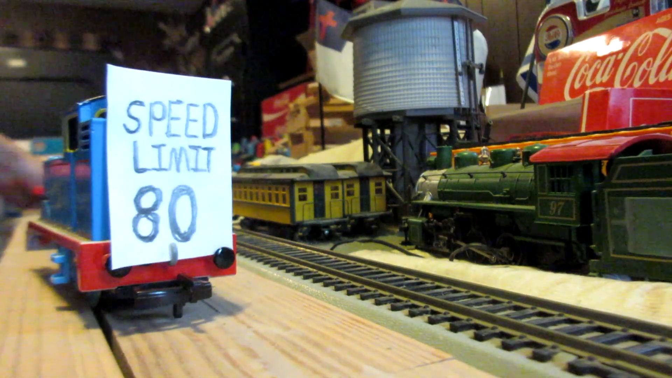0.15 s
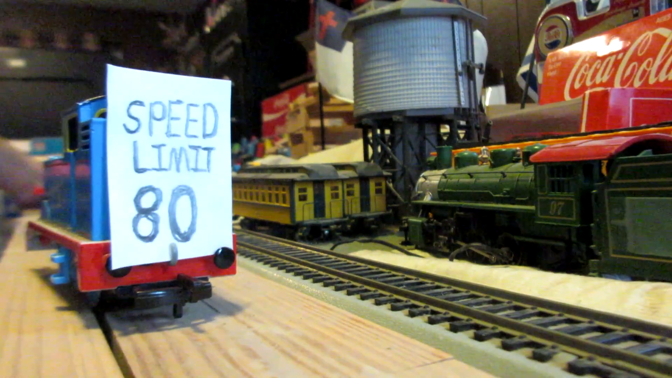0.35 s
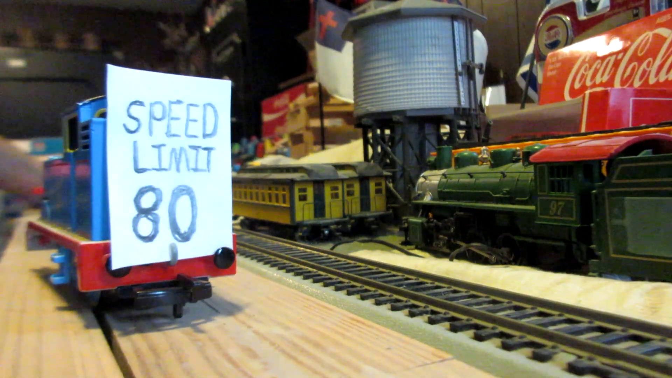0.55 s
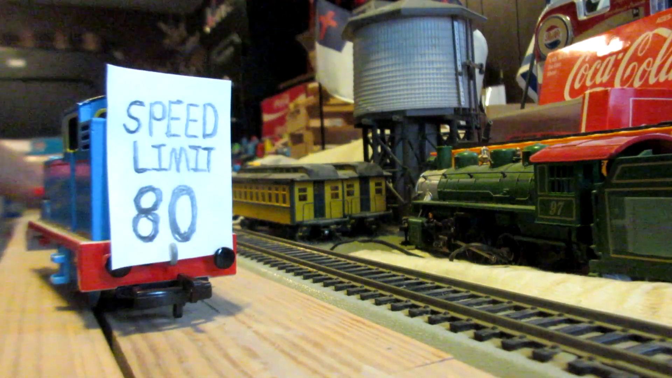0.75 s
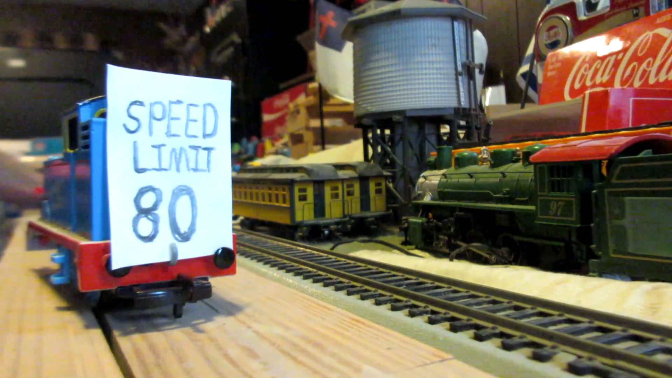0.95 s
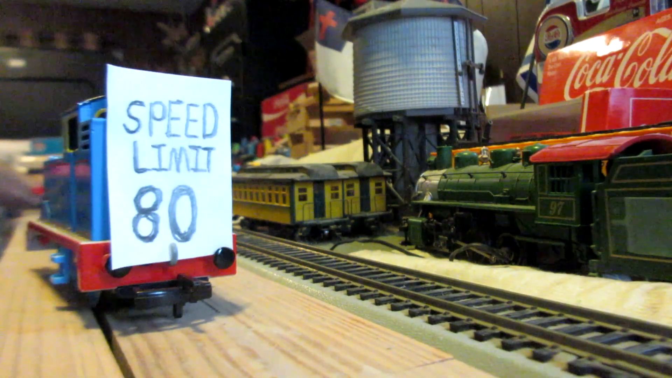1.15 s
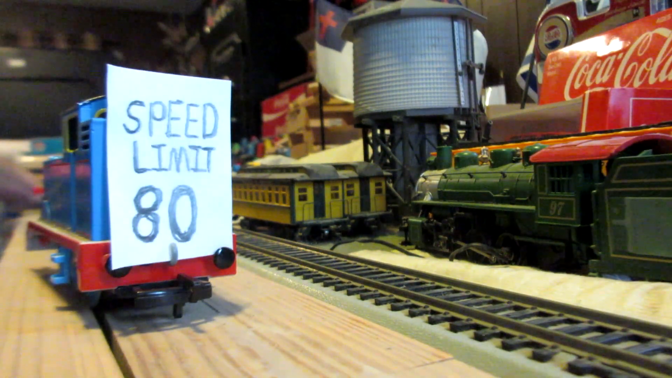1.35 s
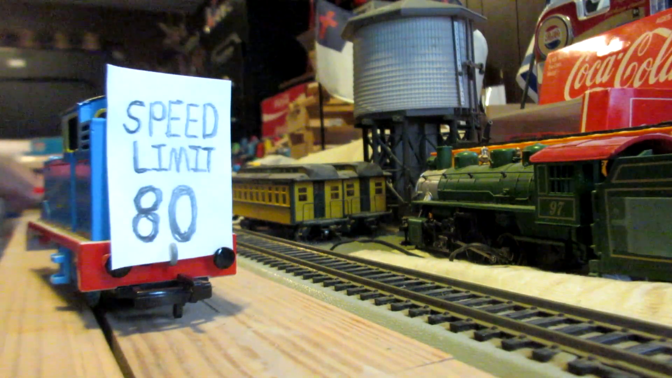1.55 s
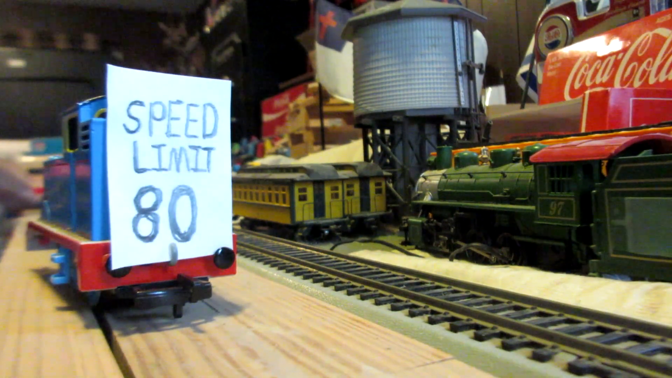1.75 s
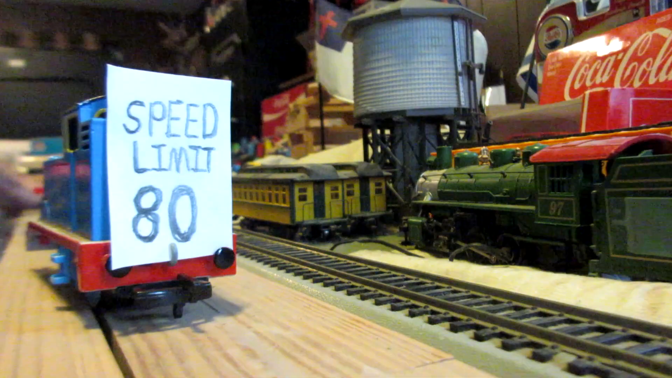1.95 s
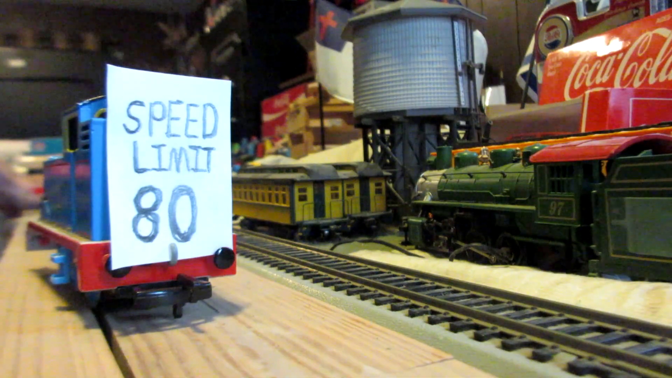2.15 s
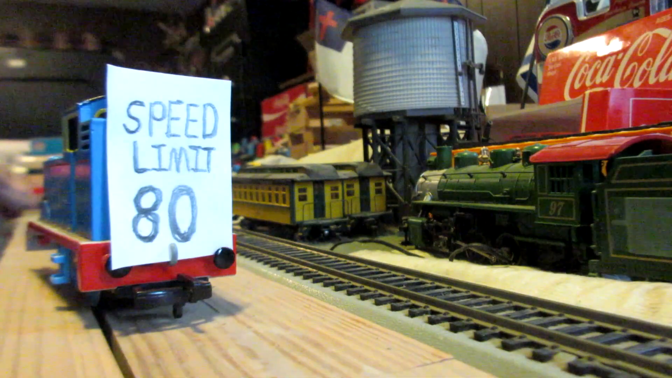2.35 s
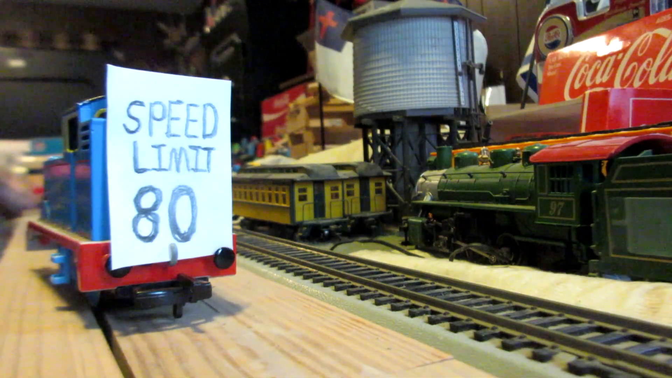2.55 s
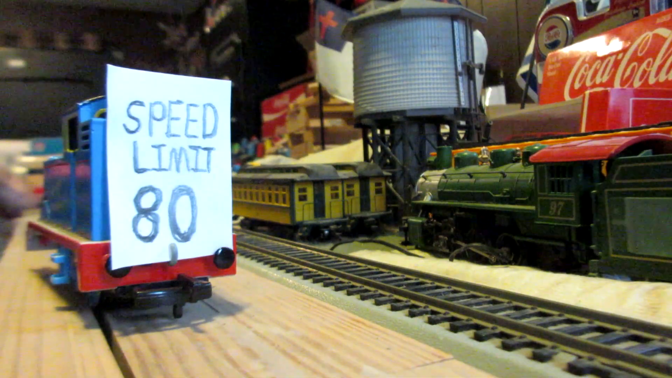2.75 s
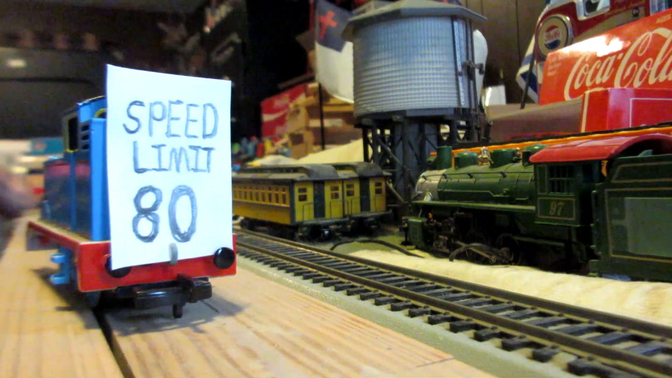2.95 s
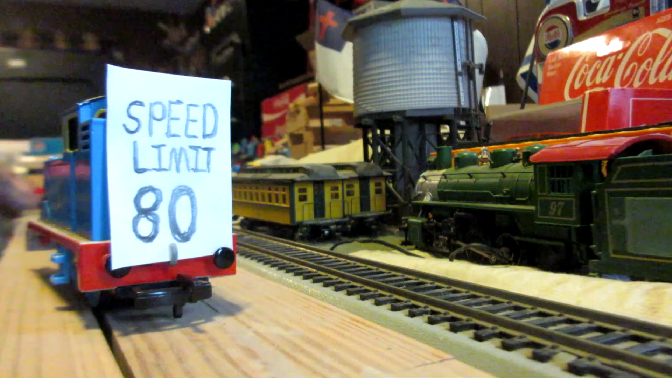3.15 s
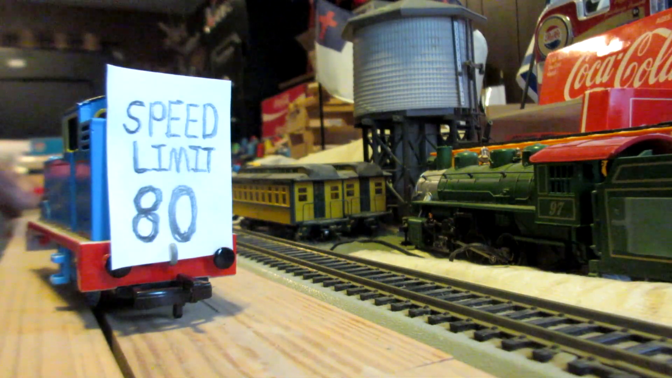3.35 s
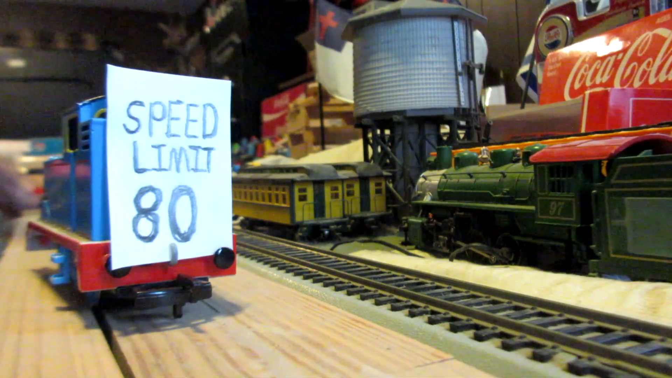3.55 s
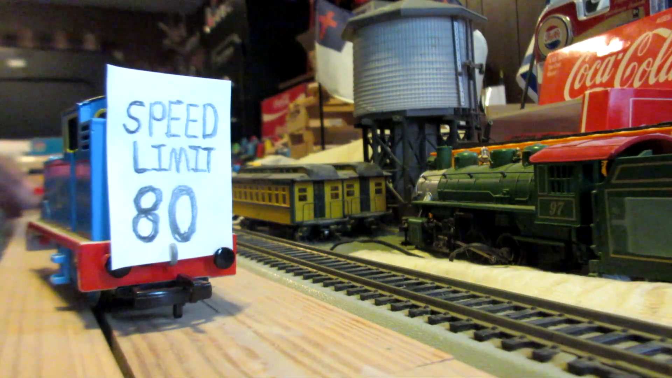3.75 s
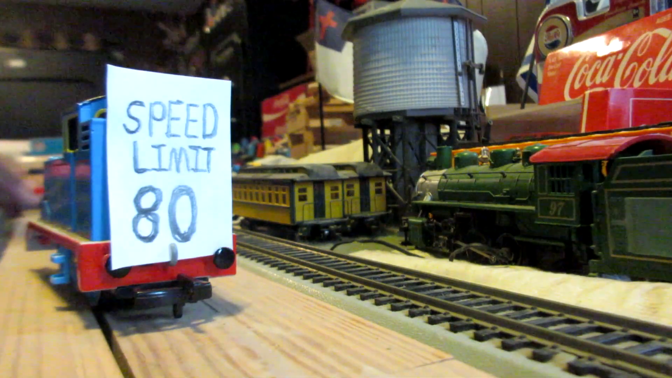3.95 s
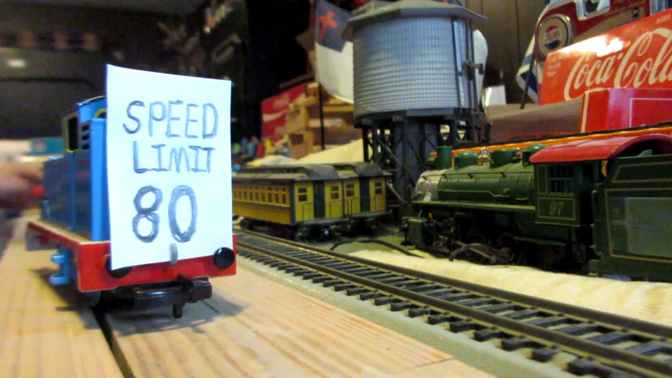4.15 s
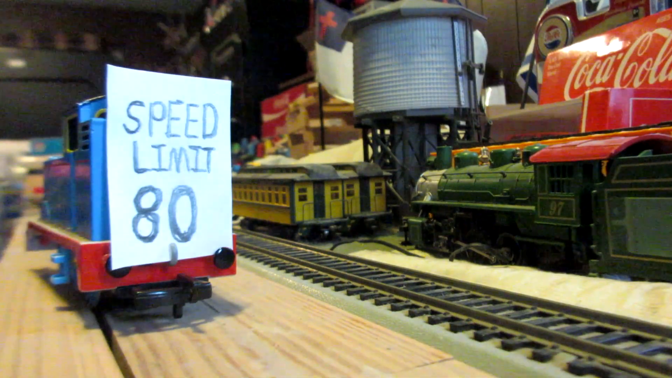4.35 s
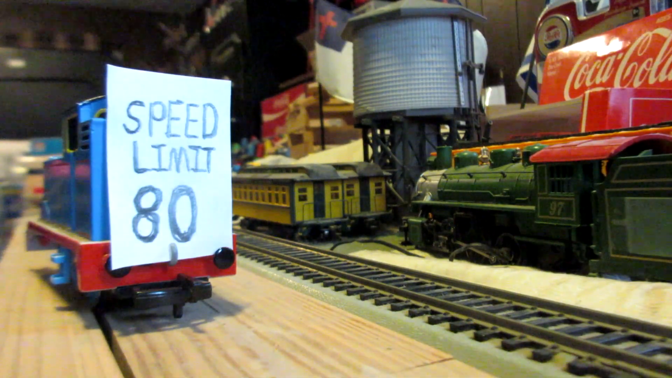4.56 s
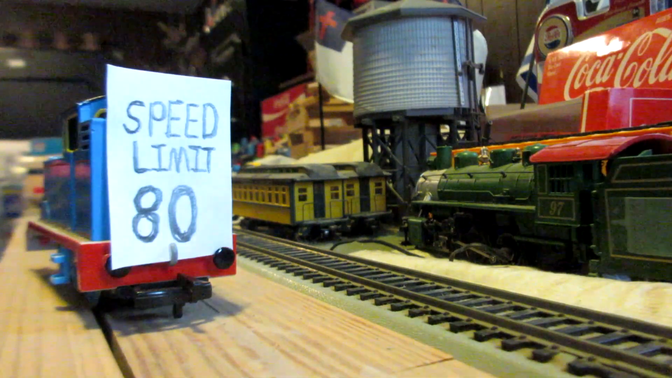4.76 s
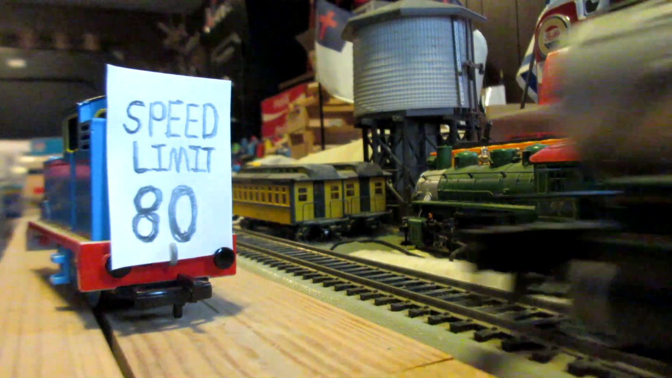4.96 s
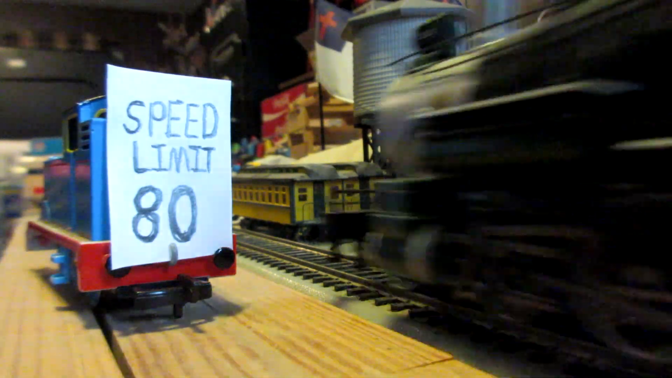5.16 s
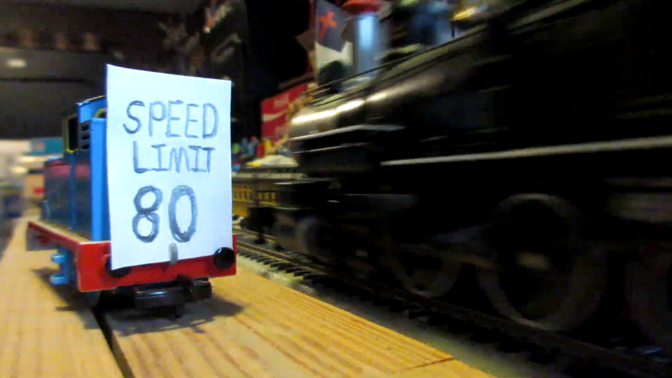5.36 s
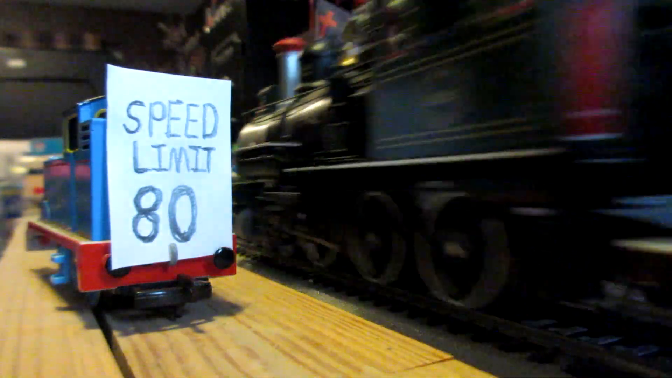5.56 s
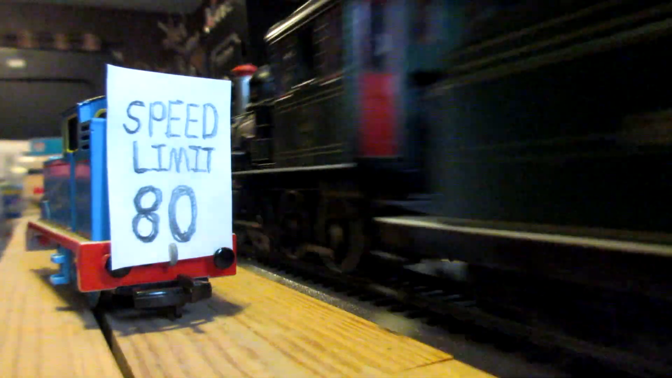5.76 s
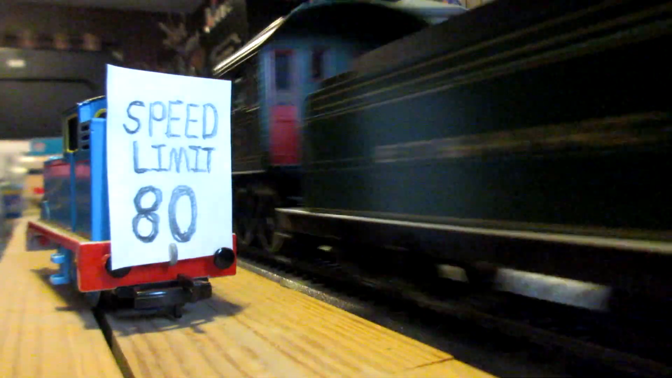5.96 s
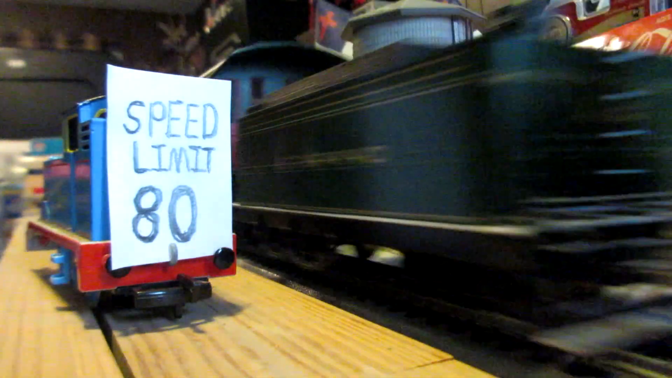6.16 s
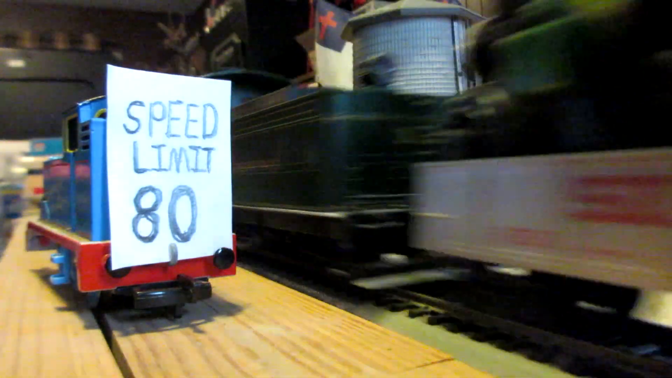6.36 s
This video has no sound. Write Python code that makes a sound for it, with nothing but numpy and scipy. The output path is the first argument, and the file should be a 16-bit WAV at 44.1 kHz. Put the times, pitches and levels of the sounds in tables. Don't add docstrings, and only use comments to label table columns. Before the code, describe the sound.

Close microphone on a wooden model railway layout indoors. A low knock and slight plastic scuff start things, with another soft bump a second later, then mostly quiet room air. Faint rail ticks and a thin rolling rattle emerge, swelling quickly into hard plastic and metal clacking, gritty wheel hiss and low table drumming as the small train passes, without fading before the cut.

```python
import sys
import numpy as np
from scipy import signal
from scipy.io import wavfile
from scipy.ndimage import uniform_filter1d

SR = 44100
rng = np.random.default_rng(int(sys.argv[2]) if len(sys.argv) > 2 else 0)


def wrap_up_sound(samples):
    columns = np.atleast_2d(samples).T
    tamed = np.clip(columns, -1, 1)
    steps = np.round(tamed * 32767).astype(np.int16)
    wavfile.write(sys.argv[1], SR, steps)


def volts_from_decibels(level):
    exponent = np.asarray(level, float) / 20
    return 10 ** exponent


N = 282681
TIME = np.arange(N) / SR

# (frequency [Hz], density [dB per Hz])
SCUFF = [(260, -21), (450, -5.5), (1110, 2), (1790, -6.5), (3180, -8), (5380, -19), (9000, -20.5),
         (11700, -38)]


def rolling():
    # (frequency [Hz], density [dB per Hz])
    axle_curve = [(1530, -2.5), (2600, 12), (3710, 4.5), (4280, 1), (4800, -5.5), (6240, -29),
                  (10600, -120)]
    # (frequency [Hz], density [dB per Hz])
    flange_curve = [(2740, -14.5), (4650, -1.5), (6200, -6.5), (8500, -16.5), (12000, -31.5), (15200, -55)]
    # (frequency [Hz], width [Hz], level over the flanges [dB])
    rail_modes = [(5500, 200, 8), (6250, 200, 5), (7280, 300, 8.6)]
    shudder = wobble(0.02)
    gears = contacts(1200, 3.6, 1.51) * volts_from_decibels(0.29 * shudder + 0.32 * wobble(0.01))
    treads = contacts(900, 7.3, 1.97) * volts_from_decibels(1.0 * shudder + 0.72 * wobble(0.0051))
    ahead = np.interp(TIME, [3.08, 4.2], [1, 0])
    surge = surge_db()
    axle_gain, flange_gain, fizz_gain = wheel_gains()

    shell = volts_from_decibels(nearness_db() + 0.5 * surge) * (shell_rattle(gears, ahead) + drones(gears[::-1]))
    axles = sing(colour(treads + 0.54 * gears, axle_curve), [(4160, 330, -6.5)], 1 - ahead)
    flanges = sing(colour(treads, flange_curve), rail_modes, ahead)
    near = (shell
            + volts_from_decibels(-3.0 + 0.23 * surge) * axle_gain * axles
            + volts_from_decibels(-1.7 + 0.23 * surge) * flange_gain * flanges
            + volts_from_decibels(-1.5 + 0.13 * surge) * fizz_gain * rail_fizz(treads))
    return patchy(near, 1.02)


def contacts(per_s, spread_db, hiss):
    hit, size, sign = rng.random((N, 3)).T
    size_db = spread_db * np.minimum(-np.log(size + 1e-9), 3.6)
    clicks = (hit < per_s / SR) * volts_from_decibels(size_db) * np.sign(sign - .5)
    return evened(clicks) + hiss * rng.standard_normal(N)


def shell_rattle(gears, ahead):
    # (frequency [Hz], density [dB per Hz])
    shell_curve = [(290, -44.5), (500, -8.5), (556, -10.5), (1660, -3), (2700, -7), (3510, -15.5),
                   (5940, -120)]
    # (time [s], frequency [Hz], level [dB])
    hollows = [(2.6, 1360, 3), (2.8, 1670, 2), (2.85, 1430, 0), (2.95, 1880, 4), (3.02, 1430, -4),
               (3.79, 1720, -5.5), (3.81, 1600, -9), (4.06, 1450, 2), (4.3, 1540, -4), (4.36, 1310, -3),
               (4.52, 1630, -8), (5.32, 1630, -1), (5.35, 1760, -1), (5.49, 1530, -1), (5.83, 1800, -1.5),
               (5.87, 1630, 0.5), (6.32, 1700, 1), (6.41, 1510, -1)]
    # (frequency [Hz], width [Hz], level over the shell [dB])
    rail_modes = [(693, 175, 0.5), (2330, 120, -13)]
    s, hollow_hz, boom_db = np.transpose(hollows)
    hz = np.interp(TIME, s, hollow_hz) * (1 + 0.12 * wobble(0.0093))
    cavity = volts_from_decibels(-4.0 + np.interp(TIME, s, boom_db)) * resonate(gears, hz, 490)
    rattle = sing(colour(gears, shell_curve) + cavity, rail_modes, ahead)
    return volts_from_decibels(0.04) * steady(evened(rattle), 0.03)


def drones(x):
    # (centre [s], half width [s], level over the shell [dB], frequency [Hz])
    panels = [
        (2.88, 0.099, -3.5, 670),
        (3.62, 0.14, -10.5, 2370),
        (4.17, 0.12, -4.5, 1450),
        (4.4, 0.099, -10, 1450),
        (4.96, 0.075, -2.5, 1650),
        (5.15, 0.17, -11, 805),
        (5.3, 0.092, -9.5, 2030),
        (5.65, 0.2, -17, 780),
        (5.88, 0.096, -10, 1700),
        (6.35, 0.14, -14.5, 750),
    ]
    rows, out = np.array(panels), np.zeros(N)
    grid, hump = humps(rows[:, 0], rows[:, 1])
    for (s, half, db, hz), facing in zip(rows, hump):
        out += volts_from_decibels(db) * np.interp(TIME, grid, facing) * resonate(x, hz, hz / 6.2)
    return out


def rail_fizz(treads):
    # (frequency [Hz], density [dB per Hz])
    close_curve = [(4530, -50), (6500, -8.5), (8600, 1), (10900, -7), (12800, -9), (15200, -15)]
    # (frequency [Hz], density [dB per Hz])
    far_curve = [(4530, -35), (7500, 0), (8750, 6), (10200, -3), (11000, -10), (12100, -2), (12700, -11),
                 (15200, -22)]
    clear = np.interp(TIME, (5, 4.76), [0, 1])
    grit = treads * volts_from_decibels(0.29 * wobble(0.016))
    whine = volts_from_decibels(4.8 * wobble(0.044)) * np.interp(TIME, [5.7, 8.5], [1, 0])
    close = sing(colour(grit, close_curve), [(15000, 400, -37)], whine)
    return np.sqrt(1 - clear) * colour(grit[::-1], far_curve) + np.sqrt(clear) * close


def nearness_db():
    # (time [s], level [dB])
    approach = [(2.3, -64), (2.52, -55), (2.65, -49), (2.94, -43.5), (3.1, -41), (3.3, -36), (3.44, -36.5),
                (3.53, -33), (3.62, -33), (3.72, -32.5), (4.085, -27), (4.105, -28), (4.3, -25),
                (4.42, -22.5), (4.7, -18), (5.01, -19), (5.1, -20), (6.41, -20.5)]
    s, db = np.transpose(approach)
    return np.interp(TIME, s, db) - 60 * np.clip(s[0] - TIME, 0, 9)


def surge_db():
    # (centre [s], half width [s], level [dB])
    surges = [(3.412, 0.006, -8), (3.456, 0.009, 0), (3.488, 0.0099, 6.5), (3.522, 0.006, 4),
              (3.558, 0.006, -3), (3.582, 0.0045, 3), (3.65, 0.006, -7), (3.726, 0.054, 5),
              (3.816, .005, -1), (3.829, 0.006, 2), (3.949, 0.011, -2), (3.999, 0.0055, 5),
              (4.025, 0.006, -2), (4.063, 0.018, -5.5), (4.101, 0.0048, 7), (4.208, 0.02, -1),
              (4.238, .005, -4), (4.254, 0.006, 4), (4.318, 0.0076, -1), (4.37, 0.019, 4),
              (4.5, 0.009, -1.5), (4.522, 0.0053, 7), (4.54, 0.006, 2), (4.618, 0.0073, -1),
              (4.667, 0.009, 2), (4.727, 0.0071, 3), (4.815, 0.013, 1.5), (4.847, 0.006, -3),
              (4.883, 0.0059, -12), (4.925, 0.006, 3), (5.009, 0.011, -1.5), (5.037, 0.006, 2),
              (5.053, 0.013, -2.5), (5.16, 0.006, -4), (5.202, 0.013, -1), (5.23, 0.006, -5),
              (5.304, 0.013, 4), (5.478, 0.0054, 4), (5.541, 0.005, -1), (5.637, 0.009, 1),
              (5.72, 0.0063, -10), (5.839, 0.0053, 2), (6.04, 0.006, 2), (6.062, 0.0065, -10),
              (6.13, 0.016, -1.5), (6.182, 0.0096, -9), (6.226, 0.014, 0.5), (6.256, 0.006, -4.5),
              (6.292, 0.0052, -1), (6.409, 0.02, 1)]
    rows = np.array(surges)
    grid, hump = humps(rows[:, 0], rows[:, 1])
    return np.interp(TIME, grid, rows[:, 2] @ hump)


def wheel_gains():
    # (centre [s], half width [s], axle [dB], flange [dB], fizz [dB])
    grinds = [(2.5, 0.062, 1, 0, 2), (2.94, 0.026, 9.5, 8, -4), (3.3, 0.21, -0.5, 1, 3.5),
              (3.55, 0.057, 5, 2, 1), (4.05, 0.24, -3, -1, 4.5), (4.2, 0.092, -2, 4.5, -9),
              (4.37, 0.055, -2, 5, 5), (4.52, 0.032, -2, 3.5, -1), (4.84, 0.11, 3, 2.5, 2.5),
              (5.04, 0.088, -9, 5.5, 3), (5.2, 0.11, 3, 1, 5.5), (5.4, 0.07, -4.5, 3.5, 6),
              (5.52, 0.038, 1, 1, 2.5), (5.66, 0.16, 3, 2, 6.5), (5.8, 0.065, -4.5, -1.5, -20),
              (6.05, 0.14, 3, 1.5, -1), (6.28, 0.084, 4.5, 1, -24), (6.41, 0.057, -2, 0, -11)]
    rows = np.array(grinds)
    near = nearness_db() + 21.5
    grid, hump = humps(rows[:, 0], rows[:, 1])
    # (level alongside [dB], gain per dB of nearness)
    laws = (-31, 1.01), (-35, 2.32), (-43.5, 1.34)
    return [volts_from_decibels(db + slope * near + np.interp(TIME, grid, extra @ hump))
            for (db, slope), extra in zip(laws, rows[:, 2:].T)]


def joints():
    # (time [s], shell knock [dB], wheel tick [dB], rail spark [dB])
    joints_far = [(2.5048, -28, -41, -57), (2.6338, -34, -49, -60), (2.762, -35, -47, -62),
                  (2.9386, -27, -39, -43.5), (3.0786, -25, -41, -56), (3.137, -14, -30, -37.5),
                  (3.1652, -23.5, -36, -55), (3.3832, -14.5, -27.5, -32), (3.427, -24, -42, -48),
                  (3.5207, -18, -38, -41), (3.5396, -26, -35, -44), (3.6264, -21, -38, -50),
                  (3.716, -15.5, -31, -37), (3.7804, -25, -40, -43), (3.8245, -19, -26.5, -29.5),
                  (3.8784, -30, -38, -42), (3.9673, -30, -42, -38), (3.9923, -21, -23.5, -36),
                  (4.0958, -7.5, -28, -23.5), (4.106, -11.5, -28, -37), (4.1522, -13.5, -25, -35),
                  (4.2176, -15, -33, -34), (4.2467, -8, -19, -25), (4.2532, -11, -36, -32),
                  (4.345, -11, -25, -29), (4.3622, -16, -20, -26.5), (4.4284, -27, -25, -36),
                  (4.4846, -25, -28, -32), (4.518, -14, -23, -31)]
    # (time [s], shell knock [dB], wheel tick [dB], rail spark [dB])
    joints_near = [(4.61, -6, -35, -29), (4.6294, -22, -28.5, -35.5), (4.7183, -21, -15.5, -31),
                   (4.727, -6, -20, -24.5), (4.7568, -10, -25, -33), (4.8072, -16, -18, -39),
                   (4.833, -3.5, -12, -34), (4.8597, -4, -11.5, -33), (4.9, -9.5, -12, -39),
                   (4.925, -14, -25, -44), (5.0065, -3, -24, -27), (5.02, -11, -32, -32),
                   (5.0958, -12, -19, -40), (5.14, -17, -15.5, -34), (5.1479, -9.5, -20, -24.5),
                   (5.238, -16, -33, -29), (5.2744, -9, -16.5, -40), (5.333, -19, -21, -37.5),
                   (5.506, -26, -22, -26.5), (5.579, -28, -19, -36), (5.722, -29, -28, -29),
                   (5.8352, -29, -18.5, -34), (5.8892, -23, -26, -30), (5.9252, -12, -24, -47),
                   (6.02, -15, -30, -29), (6.032, -6.5, -28, -25), (6.1237, -8, -27, -26),
                   (6.1436, -8.5, -16.5, -30), (6.2327, -9, -27, -28), (6.3813, -5.5, -18.5, -40)]
    # (frequency [Hz], density [dB per Hz])
    tick_curve = [(1760, -36), (3000, 6), (4030, 4), (5290, 0), (6980, -4.5), (7600, -5), (9880, -24),
                  (16700, -120)]
    # (frequency [Hz], density [dB per Hz])
    shaded_curve = [(3820, -32), (6500, 1), (7330, -5), (7990, -2), (8890, 3), (10400, -8.5), (13400, -11),
                    (15600, -18)]
    # (frequency [Hz], density [dB per Hz])
    clear_curve = [(5000, -5), (8000, 6.5), (11000, -0.5), (14000, -10), (15600, -7)]
    # (frequency [Hz], level [dB], t60 [s])
    knock_modes = [(1267, 1.5, 0.039), (1640, 7, 0.019), (2250, 10, 0.0071), (2840, -5.5, 0.038)]
    out, t = np.zeros(N), np.arange(1300) / SR
    rows = joints_far + joints_near
    chances = rng.standard_normal((len(rows), 2 * len(t) + 4))
    for (s, knock_db, tick_db, spark_db), c in zip(rows, chances):
        t60 = 0.01 if s >= joints_near[0][0] else 0.021
        spark_curve = clear_curve if s > 3.8 else shaded_curve
        shape = np.minimum(t / 0.0024, 1) * volts_from_decibels(-60 * t / t60)
        tick = crest(colour(c[:len(t)], tick_curve) * shape)
        spark = crest(colour(c[len(t):-4], spark_curve) * shape)
        knock = ring([(hz, level, ring_s * t60 / 0.034) for hz, level, ring_s in knock_modes], c[-4:])
        knock = crest(knock * np.minimum(np.arange(len(knock)) / (0.0014 * SR), 1))
        add(out, s - .0003, volts_from_decibels(tick_db - 3.0) * tick)
        add(out, s - .0003, volts_from_decibels(spark_db - 1.5) * spark)
        add(out, s - .0003, volts_from_decibels(knock_db - 7.5) * knock)
    return out


def glints():
    # (time [s], level [dB])
    clinks = [(2.937, -45), (3.1605, -47), (3.2091, -55), (3.3825, -42), (3.5406, -48), (3.5744, -50),
              (3.824, -28), (3.8958, -42), (3.9926, -33), (4.0943, -19.5), (4.245, -21), (4.2852, -35),
              (4.4845, -28), (4.6741, -31), (4.9355, -35), (4.9606, -32), (5.0058, -28.5), (5.1395, -21),
              (5.5057, -28), (5.8339, -26.5), (6.1248, -27), (6.1427, -30), (6.1604, -29), (6.2325, -34),
              (6.3677, -32)]
    # (frequency [Hz], density [dB per Hz])
    clink_curve = [(9500, -25), (12000, -3), (14500, -2), (16500, -3)]
    # (centre [s], half width [s], level [dB])
    peeps = [
        (4.39, 0.042, -50),
        (4.6, .015, -44),
        (4.87, 0.021, -43),
        (4.975, .02, -45),
    ]
    out, t = np.zeros(N), np.arange(1300) / SR
    shape = np.minimum(t / .0025, 1) * volts_from_decibels(-60 * t / 0.017)
    for (s, db), c in zip(clinks, rng.standard_normal((len(clinks), len(t)))):
        add(out, s - .0003, volts_from_decibels(db - 5.5) * crest(colour(c, clink_curve) * shape))
    rows = np.array(peeps)
    grid, hump = humps(rows[:, 0], rows[:, 1])
    peep_gain = np.interp(TIME, grid, volts_from_decibels(rows[:, 2]) @ hump)
    return out + peep_gain * resonate(rng.standard_normal(N), 12050, 450)


def board():
    # (frequency [Hz], density [dB per Hz])
    boom_curve = [(13, -44), (22, -20), (75, -3.5), (145, -9.5), (190, -34), (320, -120)]
    # (frequency [Hz], density [dB per Hz])
    engine_curve = [(79, -36), (135, -2.5), (232, 2), (372, -0.5), (556, -5.5), (620, -10), (810, -22),
                    (1360, -120)]
    # (frequency [Hz], density [dB per Hz])
    carriage_curve = [(90, -33), (125, -1), (150, -3.5), (200, -8.5), (260, -4), (372, -2), (620, -1),
                      (810, -5)]
    boom_gain, panel_gain = board_gains()
    deep_noise, drum_noise = rng.standard_normal((N, 2)).T
    load = np.interp(TIME, [5.02, 5.36], [0, 1])
    mode_hz = 78.2 * 1.16 ** load
    deep = colour(deep_noise, boom_curve) * 0.5 + resonate(deep_noise, mode_hz, 16)
    deep = steady(evened(deep), 0.071)
    drum = drum_noise * volts_from_decibels(1.9 * wobble(0.0095))
    drum = (1 - load) * colour(drum, engine_curve) + load * colour(drum, carriage_curve)
    return volts_from_decibels(-1.0) * boom_gain * deep + volts_from_decibels(-1.0) * panel_gain * drum


def board_gains():
    # (centre [s], deep boom [dB], panel drumming [dB], half width [s])
    loads = [(2.55, -50.5, -52.5, 0.087), (2.62, -65, -51, 0.033), (2.78, -46.5, -47, 0.045),
             (2.95, -48, -44.5, 0.14), (3.17, -41, -42, 0.082), (3.44, -37.5, -44.5, 0.12),
             (3.55, -29.5, -53, 0.029), (3.73, -39, -38.5, 0.039), (3.87, -30.5, -52, 0.04),
             (4.0, -36, -33, 0.035), (4.16, -40, -33.5, 0.09), (4.25, -53, -32, 0.02),
             (4.39, -56, -32.5, 0.12), (4.509, -32, -27.5, 0.024), (4.62, -35, -31.5, 0.039),
             (4.69, -35, -31.5, 0.085), (4.76, -45, -40, 0.023), (5.1, -54, -32.5, 0.48),
             (5.27, -35.5, -50, 0.061), (5.38, -49, -32, 0.013), (5.492, -31, -31.5, 0.034),
             (5.8, -46, -34, 0.29), (6.05, -34.5, -32, 0.036), (6.13, -38, -28, 0.023),
             (6.22, -38, -32.5, 0.023), (6.37, -34.5, -33, 0.035)]
    rows = np.array(loads)
    grid, hump = humps(rows[:, 0], rows[:, 3])
    # (level over nearness [dB], ceiling [dB])
    laws = (-12, -42.5), (-10.5, -36.5)
    gains = []
    for (over_db, top_db), lump_db in zip(laws, rows[:, 1:3].T):
        shaking = volts_from_decibels(2 * np.minimum(nearness_db() + over_db, top_db))
        lumps = np.interp(TIME, grid, volts_from_decibels(2 * lump_db) @ hump ** 2)
        gains.append(np.sqrt(shaking + lumps))
    return gains


def scrapes():
    # (frequency [Hz], width [Hz], level [dB])
    squeal_modes = [(4400, 400, -6), (5200, 740, 0.5), (5960, 440, -6), (6760, 430, -9)]
    # (time [s], level [dB])
    snaps = [
        (4.8335, -11),
        (5.7229, 1),
    ]
    # (frequency [Hz], level [dB], t60 [s])
    snap_modes = [(1450, -6, 0.015), (2780, 1, 0.0058)]
    # (time [s], level [dB], frequency [Hz], t60 [s])
    pings = [(.0165, -44, 620, .03), (.04, -40, 2100, 0.028), (0.9215, -28, 1110, 0.021),
             (0.9217, -33, 1610, .03), (0.924, -47, 3220, .04), (2.408, -54, 3200, 0.06),
             (2.462, -51, 3170, .08), (2.5055, -45, 2110, .05), (2.938, -35, 1880, .05),
             (2.9392, -39, 2340, .04), (2.965, -37, 910, .08), (3.138, -33, 710, 0.028),
             (3.384, -30, 650, .03), (3.826, -36, 7350, 0.062), (3.827, -34, 8950, .06),
             (4.807, -9, 5600, .008), (3.826, -24, 1330, .02), (4.0966, -14, 950, 0.018),
             (4.247, -10, 1020, 0.017), (4.3882, -13, 1190, 0.018), (4.619, -10.5, 1300, 0.023),
             (4.928, -10, 1660, 0.024), (5.0471, -12, 1010, 0.022), (5.5365, -27, 1560, .02),
             (5.792, -10.5, 2500, .02), (5.812, -12, 2200, .015), (5.8345, -11, 2230, .02),
             (5.846, -12, 1700, 0.017), (6.042, -11, 1860, 0.018), (6.155, -13, 1700, .02),
             (6.214, -10.5, 1620, 0.031), (6.289, -11, 1950, .02)]
    # (time [s], level [dB], frequency [Hz])
    rubbing = [
        (5.66, -49, 2900),
        (5.71, -22, 2820),
        (5.75, -32, 2600),
        (5.82, -42, 2450),
        (5.87, -42, 2300),
    ]
    out, rub = np.zeros(N), rng.standard_normal(N)
    slips = np.cos(2 * np.pi * 140 * (np.arange(N) - 2130) / SR)
    chatter = rub * volts_from_decibels(1.1 * wobble(0.0023) + 4.5 * slips)
    squeal = sum(volts_from_decibels(db) * resonate(resonate(chatter, hz, width), hz, width) for hz, width, db in squeal_modes)
    add(out, *burst(5.004, .021, -17, squeal[2000:]))
    add(out, *burst(0.014, 0.051, -47, colour(rub[:8000], SCUFF)[2000:]))
    for s, db in snaps:
        add(out, s, volts_from_decibels(db - 5) * ring(snap_modes, np.zeros(2)))
    onset = np.minimum(np.arange(3500) / (0.00051 * SR), 1)
    for s, db, hz, t60 in pings:
        add(out, s, volts_from_decibels(db) * ring([(hz, 0, t60)], [0]) * onset)
    s, db, hz = np.transpose(rubbing)
    rub_gain = volts_from_decibels(np.interp(TIME, s, db, left=-120, right=-120))
    return out + rub_gain * resonate(rub[::-1], np.interp(TIME, s, hz), 260)


def bumps():
    # (time [s], thud [dB], clack [dB], thud frequency [Hz], thud t60 [s])
    blows = [(.007, -20, -55, 138, 0.038), (.016, -28, -40, 269, 0.071), (0.0256, -8.5, -43, 230, 0.021),
             (0.039, -32, -59, 207, 0.17), (.047, -38, -58, 113, 0.076), (.915, -41, -43, 3180, 0.041),
             (0.922, -35.5, -39.5, 300, 0.15), (0.936, -25.5, -45, 197, 0.044),
             (0.943, -17, -52, 129, 0.021), (1.037, -47, -58, 120, .06), (1.41, -43.5, -54, 310, 0.1),
             (1.44, -46, -55, 700, 0.056), (1.449, -46, -53, 2910, 0.027), (1.46, -47, -53, 1100, .06),
             (1.904, -36, -50, 340, 0.09), (1.906, -57, -62, 3100, .03), (2.249, -43, -62, 286, 0.065),
             (2.542, -35.5, -50, 331, 0.087), (3.535, -27, -60, 66.4, 0.14),
             (3.871, -29, -66.5, 69.5, 0.14), (4.14, -27, -60, 72, .15)]
    out, t = np.zeros(N), np.arange(3500) / SR
    scuff_shape = np.minimum(t / 0.00026, 1) * volts_from_decibels(-60 * t / 0.09)
    for (s, thud_db, clack_db, hz, t60), c in zip(blows, rng.standard_normal((len(blows), len(t)))):
        modes = [(hz, 0, t60), (0.593 * hz, -8, 0.86 * t60), (1.6 * hz, -8 - hz / 200, t60)]
        add(out, s, volts_from_decibels(thud_db) * ring(modes, np.zeros(3)) * np.minimum(t * hz / 0.85, 1))
        add(out, s, volts_from_decibels(clack_db) * colour(c, SCUFF) * scuff_shape)
    return out


def patchy(x, patchy_db):
    z = signal.stft(x, nperseg=512)[2]
    patches = uniform_filter1d(rng.standard_normal(z.shape), size=7, axis=0)
    patches = uniform_filter1d(patches, size=16, axis=1)
    return signal.istft(z * volts_from_decibels(patchy_db * evened(patches)), nperseg=512)[1][:N]


def echoes(x):
    taps, t = np.zeros(9000), np.arange(9000) / SR
    at = np.arange(60, 8960, 22) + rng.integers(0, 22, 405)
    taps[at] = rng.choice([-1., 1.], len(at))
    taps = signal.lfilter([1], [1, -.4], taps) * volts_from_decibels(-60 * t / 0.33)
    return signal.fftconvolve(x, taps / np.linalg.norm(taps))[:N]


def room_tone():
    # (frequency [Hz], density [dB per Hz])
    air_curve = [(19, -33), (32, 4.5), (129, -2.5), (300, -3.5), (800, -8.5), (2000, -14), (9810, -26),
                 (15200, -33)]
    # (frequency [Hz], level [dB])
    hum = [(123.8, -69.5), (897, -70.5), (1308, -79), (1647, -72), (1895, -71)]
    out = colour(rng.standard_normal(N), air_curve) * volts_from_decibels(-51.5 + 0.21 * wobble(0.1))
    for hz, db in hum:
        level = volts_from_decibels(db + 4.0 + 0.88 * wobble(0.073))
        out += level * np.sin(2 * np.pi * hz * TIME + 2.0 * wobble(0.18))
    return out


def evened(x):
    return x / np.sqrt(np.mean(x ** 2) + 1e-20)


def add(mix, s, sound):
    part = mix[round(s * SR):][:len(sound)]
    part += sound[:len(part)]


def colour(x, points):
    f, db = np.transpose(points)
    hz = np.abs(np.fft.fftfreq(8192, 1 / SR)) + 1
    gain = np.log(volts_from_decibels(np.interp(np.log(hz), np.log(f), db, left=-70, right=-70)))
    taps = np.fft.ifft(np.exp(gain - 1j * signal.hilbert(gain).imag)).real[:4096]
    return evened(signal.oaconvolve(x, taps)[:len(x)])


def resonate(x, hz, width):
    turn = np.exp(2j * np.pi * np.cumsum(hz * np.ones(N)) / SR)
    r = np.exp(-np.pi * width / SR)
    return evened((turn * signal.lfilter([1 - r], [1, -r], x / turn)).real)


def sing(x, modes, share):
    return x + share * sum(volts_from_decibels(db) * resonate(x, hz, width) for hz, width, db in modes)


def ring(modes, chance):
    t = np.arange(3500) / SR
    out = np.zeros(len(t))
    for (hz, db, t60), c in zip(modes, chance):
        out += volts_from_decibels(db - 60 * t / t60) * np.sin(2 * np.pi * hz * (1 + 0.13 * c) * t + 3 * c)
    return np.sqrt(1 - t / t[-1]) * out


def wobble(seconds):
    size = max(int(seconds * SR), 1)
    return evened(uniform_filter1d(uniform_filter1d(rng.standard_normal(N), size), size))


def steady(x, seconds):
    return x / np.sqrt(uniform_filter1d(x ** 2, int(seconds * SR)) + 0.22)


def crest(x):
    return x / np.sqrt(uniform_filter1d(x ** 2, size=44).max())


def humps(centres, widths):
    t = np.arange(0, N / SR + .01, .002)
    return t, np.exp(-.5 * ((t - centres[:, None]) / np.maximum(widths, .005)[:, None]) ** 2)


def burst(start, length, db, sound):
    t = np.arange(int(length * SR)) / (length * SR)
    return start, volts_from_decibels(db) * np.sin(np.pi * t ** 0.83) ** 0.39 * evened(sound[:len(t)])


def scene():
    wheels, hand = joints(), bumps() + scrapes()
    wet = wheels * volts_from_decibels(np.interp(TIME, [6.2, 8.1], [-5, -12])) + volts_from_decibels(-9.0) * hand
    return (wheels + hand + echoes(wet) + rolling() + board() + room_tone() + glints())[None]


def roll_off(x):
    return signal.sosfilt(signal.butter(12, 16220, fs=SR, output="sos"), x)


def record(dry):
    # (time [s], level [dB], recovery [s])
    ducks = [
        (4.834, -2.5, 0.17),
        (5.025, -3.5, 0.1),
        (5.727, -1, 0.014),
    ]
    treble_dips = [
        3.128,
        3.374,
        3.813,
        4.086,
        4.236,
    ]
    duck_db = sum(db * (TIME > s) * np.exp(-np.abs(TIME - s) / back) for s, db, back in ducks)
    ducked = dry * volts_from_decibels(uniform_filter1d(duck_db, size=60))
    ducked = ducked / (1 + (ducked / 0.9) ** 6) ** (1 / 6)
    gap = sum(np.exp(-.5 * ((TIME - s) / .0032) ** 2) for s in treble_dips)
    smooth = signal.filtfilt(*signal.butter(3, 10000, fs=SR), ducked)
    ducked = ducked + (1 - volts_from_decibels(-13 * gap)) * (smooth - ducked)
    limited = signal.oaconvolve(ducked, signal.firwin(401, 15060, fs=SR)[None], "same")
    return roll_off(limited)


dry = scene()
out = record(dry)
wrap_up_sound(out)
```